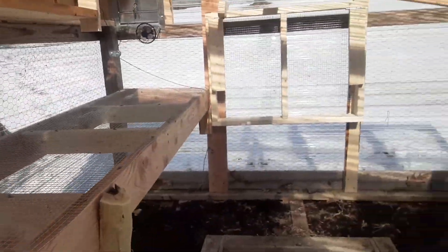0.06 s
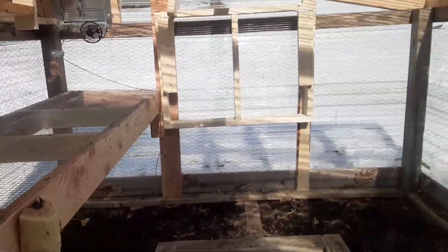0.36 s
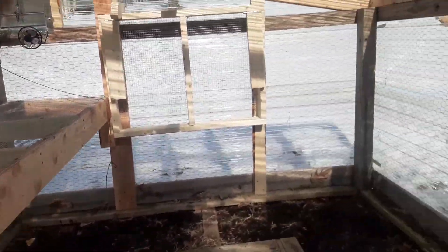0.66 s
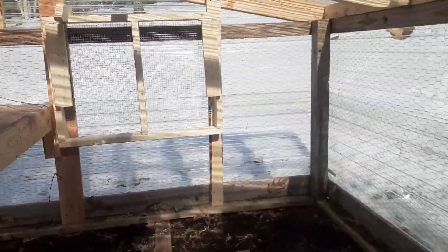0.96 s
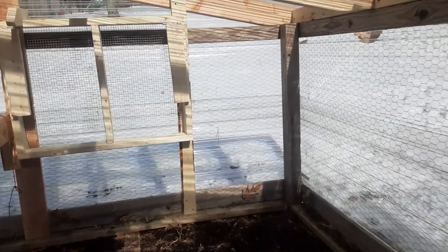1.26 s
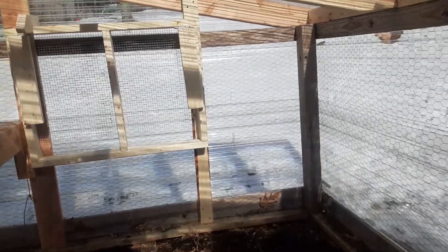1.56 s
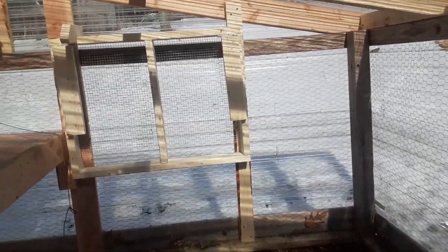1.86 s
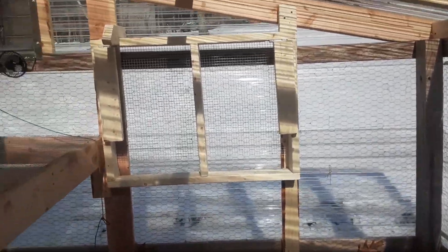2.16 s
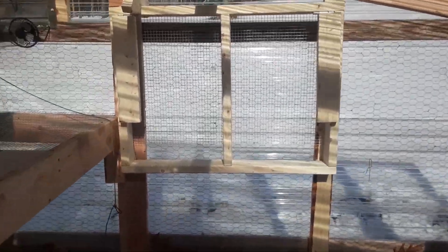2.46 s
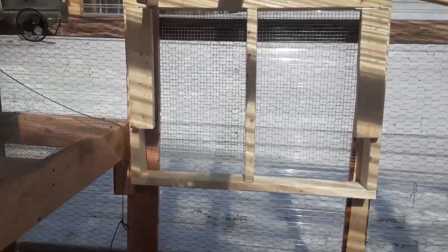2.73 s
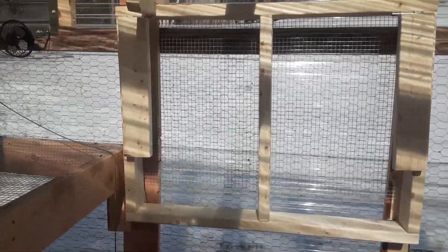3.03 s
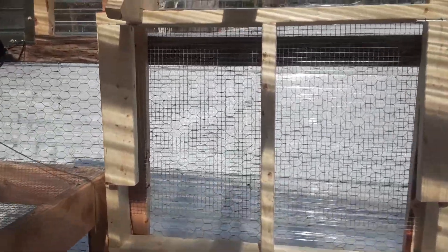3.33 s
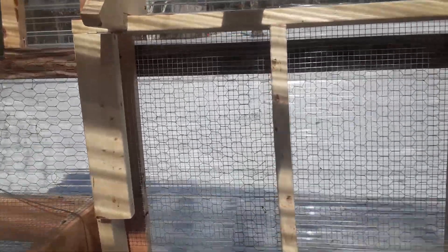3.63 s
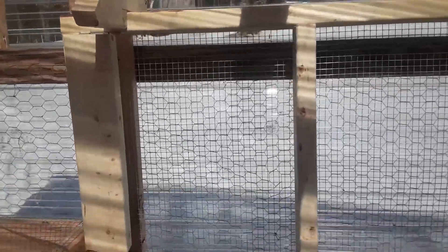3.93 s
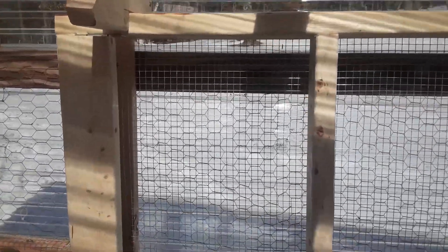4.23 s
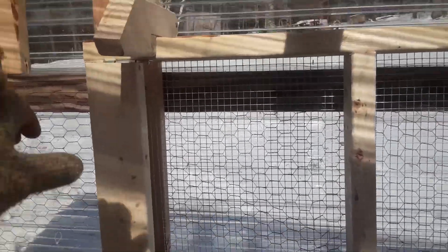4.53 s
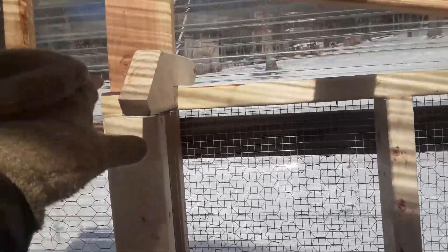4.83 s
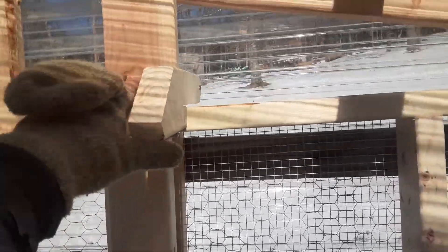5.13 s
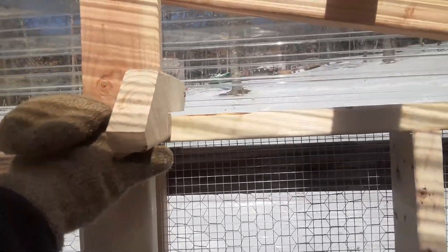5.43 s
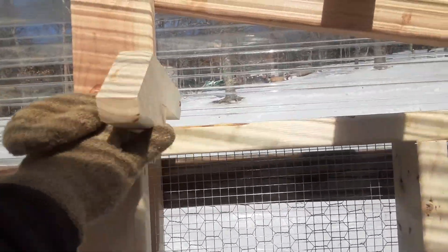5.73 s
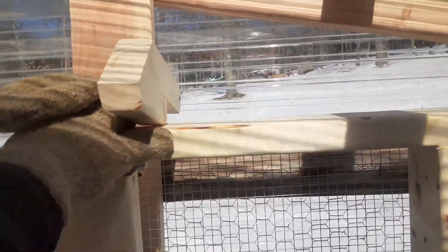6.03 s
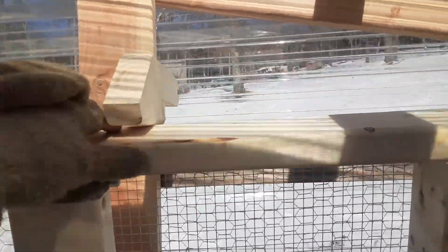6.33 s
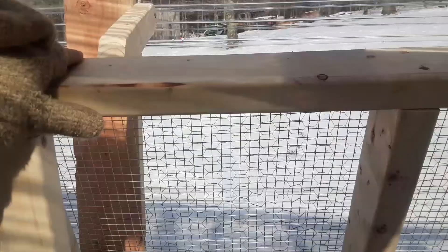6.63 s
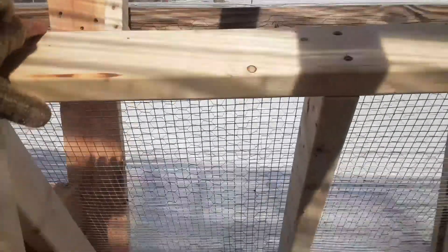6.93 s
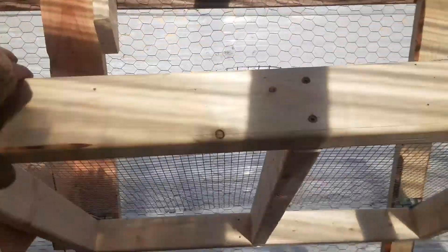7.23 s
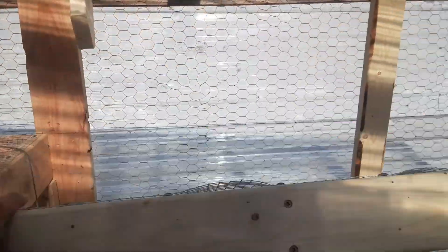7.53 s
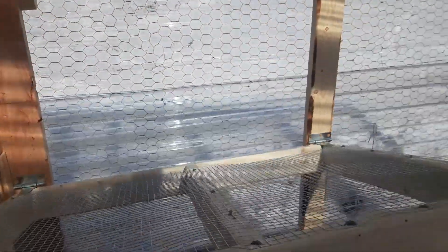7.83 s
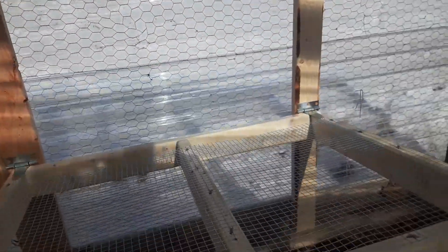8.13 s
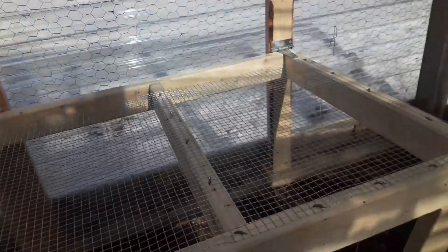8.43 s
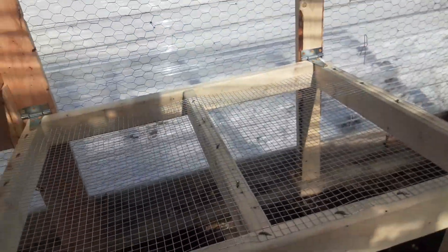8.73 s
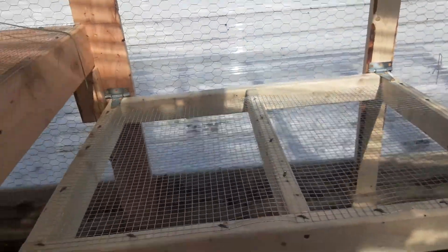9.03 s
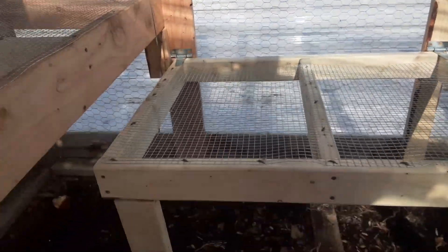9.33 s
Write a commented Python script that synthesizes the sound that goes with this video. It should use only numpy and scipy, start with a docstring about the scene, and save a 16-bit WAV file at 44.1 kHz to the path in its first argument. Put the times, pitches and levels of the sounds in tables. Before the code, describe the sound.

Close up in a small, light-walled greenhouse, quiet steps scuff on soil and something scrapes briefly. Gloved hands work a slightly squeaky wooden catch with rustles and small taps. Heavier knocks follow as a fold-down wooden bench comes loose, each with a rattle of mesh and a shudder of the walls. It drops with a soft swish, bangs onto its legs and ticks as it settles. A faint low hum lies underneath.

```python
"""Gritty steps cross the dirt floor of a small greenhouse, over faint outdoor noise and a low hum.
Something scrapes close by. A gloved hand works the squeaky wooden turn-block of a fold-down bench
until its wooden frame comes free and knocks about. The wire-mesh top swishes down through the air
and the bench lands on its legs, ticking as it settles. Each blow rings the frame, rattles the mesh
and shakes the light walls."""
import sys
import numpy as np
from scipy import signal
from scipy.fft import rfft, irfft, next_fast_len
from scipy.io import wavfile
from scipy.ndimage import uniform_filter1d, map_coordinates

SR = 44100
rng = np.random.default_rng(int(sys.argv[2]) if len(sys.argv) > 2 else 0)


def unload_audio(sound):
    """Save the sound as a 16-bit wav file, at the path given as the first command line argument."""
    columns = np.transpose(np.atleast_2d(sound))
    # keep every value between -1 and 1, then stretch to whole-number steps
    steps = np.round(np.clip(columns, -1, 1) * 32767)
    wavfile.write(sys.argv[1], SR, steps.astype(np.int16))


N = 413216

# blows on the frame: start_s, level_db, edge_db
BLOWS = [(5.384, -40.5, -14.5), (5.575, -28.5, -12.5), (5.632, -26, -30.5), (5.766, -39.5, -17.5),
         (5.953, -26, -11.5), (6.027, -4, -14.5), (6.189, -24, -12.5), (6.245, -25, -20.5),
         (6.324, -32, -15), (6.7695, -3.5, 2), (6.847, -15, -26), (7.038, -14.5, -10.5),
         (7.12, -32.5, -6.5), (8.2609, -2, 1)]
LANDING_S = BLOWS[-1][0]
# wall vibration spectrum: freq_hz, level_db
WALL_SPECTRUM = [(25, -31), (60, -1.5), (120, 4.5), (200, 1), (250, -7.5), (335, 0), (430, -9.5),
                 (530, -16), (800, -18), (1150, -23.5), (1550, -27), (3000, -41), (8000, -51.5),
                 (15000, -61.5)]
# gritty contact spectrum: freq_hz, level_db
GRIT_SPECTRUM = [(100, -8.5), (400, -4), (600, -2.5), (850, -0.5), (1300, 0), (2200, -5), (4000, -11.5),
                 (8000, -14.5), (15000, -25)]


def knocks(shudder_db=-6.5, bass_per_edge=-0.15):
    """Each blow rings the frame; mesh and walls take it up, dying fast, then slowly."""
    # frame modes: freq_hz, level_db, t60_s
    frame_modes = [(84, -44.5, 0.25), (128.6, -22.5, 0.26), (190.6, -13.5, 0.33), (307.4, -2.5, 0.11),
                   (340.2, -4.5, 0.22), (348, -19, 0.059), (438.5, -8, 0.12), (499, -15, 0.18),
                   (560, -18, 0.17), (660, -10, 0.065), (774, 1, 0.026), (836, -23.5, 0.044),
                   (1017, -13.5, 0.031), (1526, -15.5, 0.042), (1808, -30, 0.054)]
    # gentle blows stay in contact longer, so carry more bass: level_db, bass_db
    bass_by_force = [(-36.5, 10.5), (-13, -10), (-1.5, -9)]
    out, t = np.zeros((2, N)), np.arange(3 * SR // 2) / SR
    frame = ring(frame_modes, t) * (1 - np.exp(-t / 0.002))
    wall_decay = (amp(-60 * t / 0.37) + amp(-17 - 60 * t / 1.79)) * (1 - np.exp(-t / 0.0045))
    for start_s, level_db, edge_db in BLOWS:
        shudder = amp(shudder_db) * wall_decay * spread(grains(len(t), spike_db=2), WALL_SPECTRUM)
        crack = amp(-20 - 60 * t / 0.036) * spread(noise(len(t)), GRIT_SPECTRUM, tilt_db=-2.5)
        # loose mesh chatters against its staples
        spurts = amp(-45 - 60 * t / 1.87) * amp(3 * wobble(22)[:len(t)])
        chatter = spurts * spread(grains(len(t), spike_db=3), GRIT_SPECTRUM, tilt_db=-3.5)
        # a padded contact trades upper modes for bass
        bass_db = np.interp(level_db, *np.transpose(bass_by_force)) + bass_per_edge * edge_db
        contact = [(25, -7), (60, bass_db - 0.5), (130, bass_db), (290, 1),
                   (430, -2.5 + 0.27 * edge_db), (600, edge_db)]
        add(out, start_s, amp(level_db) * causal(frame + shudder + crack + chatter, contact))
    return out


def swish(start_s=7.72, rise_s=0.19, level_db=-40, growth_db_per_s=6, hoot_hz=370, hoot_db=2):
    """Wires shed eddies as the bench falls: louder and deeper, with a growing hoot, until it lands."""
    # eddy spectrum: freq_hz, level_db
    eddies = [(100, -22), (220, -12.5), (330, 1), (520, -7.5), (1000, -4.5), (1600, -13), (3000, -25),
              (8000, -39), (15000, -54)]
    t, fall_s = np.arange(N) / SR - start_s, LANDING_S - start_s
    swing = np.clip(t / fall_s, 0, 1)
    bright = np.sqrt(1 - swing) * spread(noise(N), eddies, tilt_db=4)
    deep = np.sqrt(swing) * spread(noise(N), eddies, tilt_db=1.5)
    hoot = amp(hoot_db) * swing ** 2 * unit(resonance(spread(noise(N), eddies), hoot_hz, q=2.6))
    speed = stroke(t, rise_s, fall_s - rise_s, t60_s=0.12)
    gain = speed ** 1.84 * amp(level_db + growth_db_per_s * fall_s * swing + 0.88 * wobble(56))
    return gain * (bright + deep + hoot)


def steps(mid_db=-40, mid_t60_s=0.28, halving_db=20.5):
    """Gritty scuffs swell and die, firm ones soonest; heels thump the soil."""
    # sole scuffs: start_s, level_db, rise_s, tilt_db_per_octave, pitch_hz
    scuffs = [(.15, -64, 0.28, 0.5, 450), (.82, -55.5, 0.0039, 2, 2970), (1.538, -48.5, 0.016, 1.5, 2000),
              (2.332, -47.5, .003, -6, 880), (2.41, -38.5, 0.055, 0, 427), (2.703, -51, 0.0068, 1, 1280),
              (2.812, -42.5, 0.013, 0, 1640), (2.959, -50.5, 0.0016, 7, 1260),
              (3.548, -45, 0.023, -2, 1250), (3.817, -35, 0.0092, 0.5, 810),
              (4.191, -24.5, 0.012, -1.5, 1220), (4.286, -40, 0.0067, -3, 1520),
              (4.73, -24, 0.033, -4.5, 1030), (5.331, -49.5, 0.0067, 3.5, 2820)]
    # heel strikes: start_s, relative_db
    heels = [(2.71, -41), (3.561, -35.5), (3.614, -33), (3.873, -36.5), (4.217, -30.5), (4.744, -30)]
    # soil modes: freq_hz, level_db, t60_s
    soil_modes = [(105.2, 0.5, 0.12), (184, -3, 0.074), (300, -4, 0.066)]
    out, t = np.zeros((2, N)), np.arange(SR) / SR
    for start_s, level_db, rise_s, tilt_db, pitch_hz in scuffs:
        t60_s = mid_t60_s * 2 ** ((mid_db - level_db) / halving_db)
        envelope = amp(level_db) * stroke(t, rise_s, 0, t60_s)
        add(out, start_s, envelope * grit(tilt_db, pitch_hz, note_gain=0.37))
    thump = amp(8.5) * ring(soil_modes, t) * (1 - np.exp(-t / 0.0069))
    for start_s, relative_db in heels:
        add(out, start_s, amp(relative_db) * thump)
    return out


def scrape(start_s=4.727, level_db=-25, slip_hz=315, jitter=0.22):
    """A quick run of uneven slips with friction noise between them."""
    # scrape spectrum: freq_hz, level_db
    spectrum = [(50, -49), (110, -20.5), (200, -16), (310, 1), (410, -13), (510, -2.5), (680, -9),
                (950, -10), (1500, -21), (3000, -38.5), (8000, -42), (12500, -34), (15500, -65.5)]
    gaps_s = np.exp(jitter * rng.standard_normal(64)) / slip_hz
    slips = np.zeros((2, N))
    slips[0, np.round((start_s + np.cumsum(gaps_s)) * SR).astype(int)] = np.sqrt(SR / slip_hz)
    pressure = stroke(np.arange(N) / SR - start_s, rise_s=0.0084, hold_s=0.021, t60_s=0.12)
    friction = spread(4 * slips + noise(N), spectrum)
    return highpass(amp(level_db) * pressure * friction, 70)


def handling(grasp_s=5.07, turn_s=1.35, rub_rise_s=0.02, grip_db=-15.5, squeak_hz=1482, squeak_db=-5):
    """Cloth slides; the push makes the glove creep and the walls rumble; the turning block squeaks."""
    # sleeve and glove strokes: start_s, length_s, level_db
    rubs = [(0.247, .1, -68), (0.967, 0.16, -67), (1.91, 0.49, -60.5), (2.173, 0.018, -54.5),
            (2.821, 0.055, -50.5), (3.565, 0.22, -60.5), (5.073, .09, -57.5), (5.214, 0.095, -61),
            (5.592, .03, -55), (5.827, 0.089, -49.5), (5.963, 0.12, -50.5), (6.128, 0.053, -47.5),
            (6.258, 0.071, -52), (6.363, 0.18, -60.5), (6.538, .16, -48), (7.486, 0.2, -67.5)]
    # hand effort on the frame: time_s, level_db
    effort = [(5.1, -70), (5.5, -47.5), (5.66, -39), (5.85, -42), (6.27, -37), (6.44, -43), (7.1, -35.5),
              (7.4, -57.5), (7.75, -61)]
    # cloth friction spectrum: freq_hz, level_db
    cloth_spectrum = [(200, -13), (800, 0.5), (1550, 2), (2300, -1), (4000, -0.5), (8000, 0), (15000, -9.5)]
    t, push = np.arange(N) / SR, gain_curve(effort)
    turning = stroke(t - grasp_s, rub_rise_s, turn_s, t60_s=0.4)
    sliding = sum(amp(level_db) * stroke(t - start_s, rub_rise_s, max(length_s - rub_rise_s, 0), 0.23)
                  for start_s, length_s, level_db in rubs)
    walking = amp(-72.5) * stroke(t, rise_s=0.63, hold_s=3.5, t60_s=6)
    creep = amp(grip_db) * push * turning
    friction = np.sqrt(sliding ** 2 + walking ** 2 + creep ** 2)
    fibres = patchy(grains(N, spike_db=3.5), patch_db=2.5)
    cloth = friction * amp(1.6 * wobble(14)) * spread(fibres, cloth_spectrum)
    note = unit(resonance(resonance(noise(N), squeak_hz, q=11), squeak_hz, q=11))
    squeak = friction * turning * amp(squeak_db + 4.6 * wobble(25)) * note
    rumble = push * amp(1.73 * wobble(14)) * spread(noise(N), WALL_SPECTRUM, tilt_db=2)
    return cloth + squeak + rumble


def ticks(settle_count=9, settle_per_s=9, settle_hz=1500, settle_db=-47.5, fade_db_per_s=19):
    """Single ticks of wood and wire, then fading random ones as the bench settles."""
    # wood and wire contacts: start_s, level_db, pitch_hz
    contacts = [(.667, -55, 670), (1.868, -39, 1190), (3.173, -49, 1450), (4.395, -41.5, 1250),
                (5.139, -54, 1170), (5.238, -47.5, 1100), (6.017, -32.5, 1100), (6.716, -30, 5070),
                (7.039, -40.5, 2295), (7.145, -48, 1870), (7.486, -58.5, 1370), (8.605, -53, 3020)]
    out = np.zeros((2, N))
    for start_s, level_db, pitch_hz in contacts:
        add(out, start_s, amp(level_db) * tick(pitch_hz))
    for k, (jitter, octaves) in enumerate(rng.uniform(-0.87, 0.5, (settle_count, 2))):
        delay_s = (k + 1 + jitter) / settle_per_s
        gain = amp(settle_db - fade_db_per_s * delay_s)
        add(out, LANDING_S + delay_s, gain * tick(settle_hz * 2 ** octaves))
    return out


def tick(pitch_hz, mid_hz=1260, rise_s=0.0019):
    """An abrupt contact rings one note over a snap of grit; higher notes are brighter and shorter."""
    t, octaves = np.arange(SR) / SR, np.log2(pitch_hz / mid_hz)
    decay_scale = 2 ** (-0.69 * octaves)
    snap = stroke(t, rise_s, 0, t60_s=0.065)
    linger = amp(-6) * stroke(t, rise_s, 0, t60_s=0.33 * decay_scale)
    note = ring([(pitch_hz, 2 - octaves, 0.043 * decay_scale)], t)
    return np.maximum(snap, linger) * grit(-1.5 + 3 * octaves, pitch_hz, note_gain=0.45) + note


def grit(tilt_db, pitch_hz, note_gain):
    """One second of gritty contact noise with a hollow note."""
    rough = spread(patchy(grains(SR, spike_db=1.5), patch_db=2), GRIT_SPECTRUM, tilt_db)
    return rough + note_gain * unit(resonance(rough, pitch_hz, q=5.8))


def reflections(x, echo_db=-15, count=6):
    """Plastic panels throw the treble back within milliseconds and let the bass out."""
    out, treble = x.copy(), amp(echo_db) * highpass(x, 850)
    for delays_s in rng.uniform(0.0018, 0.022, (count, 2)):
        for side, delay_s in enumerate(delays_s):
            add(out[side:side + 1], delay_s, treble[side])
    return out


def background(hum_hz=92, air_db=2):
    """Soft outdoor noise and a wavering low hum swell and fade together."""
    # background swell: time_s, level_db
    swell = [(0, -60), (1.4, -58), (2.5, -55.5), (5.2, -54), (7.6, -65), (9.37, -71.5)]
    # outdoor spectrum: freq_hz, level_db
    spectrum = [(25, -27.5), (55, -3.5), (95, 0.5), (150, -6), (350, -1.5), (600, -13), (850, -14),
                (1100, -18), (3000, -26), (8000, -33.5), (15000, -36)]
    phase = 2 * np.pi * np.cumsum(hum_hz + 3 * wobble(7.7)) / SR
    hum = np.sin(phase) * amp(2.2 * wobble(5.2))
    air = amp(air_db) * spread(patchy(noise(N), patch_db=3), spectrum)
    return gain_curve(swell) * (hum + air)


def amp(db):
    """Decibels to gain."""
    return 10 ** (np.asarray(db) / 20)


def unit(x):
    """x at rms 1."""
    return x / np.sqrt(np.mean(x ** 2) + 1e-20)


def along(points, hz):
    """Interpolate (freq_hz, value) points on a log axis."""
    freqs_hz, values = np.transpose(points)
    return np.interp(np.log(hz + 1), np.log(freqs_hz + 1), values)


def gain_curve(points):
    """Per-sample gain from (time_s, level_db) points."""
    return amp(np.interp(np.arange(N) / SR, *np.transpose(points)))


def stroke(t, rise_s, hold_s, t60_s):
    """Attack, hold and release from t = 0."""
    return np.clip(t / rise_s, 0, 1) * amp(-60 * np.maximum(t - rise_s - hold_s, 0) / t60_s)


def ring(modes, t):
    """Damped modes struck at t = 0."""
    return sum(amp(db - 60 * t / t60_s) * np.sin(2 * np.pi * hz * t) for hz, db, t60_s in modes)


def wobble(knots_per_s):
    """Smooth random curve."""
    knots = rng.standard_normal(int(N * knots_per_s / SR) + 4)
    return map_coordinates(knots, [np.arange(N) * knots_per_s / SR])


def noise(size):
    """Two white noises."""
    return rng.standard_normal((2, size))


def grains(size, spike_db):
    """Noise in millisecond grains of random strength."""
    return noise(size) * amp(spike_db * unit(uniform_filter1d(rng.standard_normal(size), size=44)))


def patchy(pair, patch_db):
    """Ever-changing bands stand out, as when contact points shift."""
    spectra = signal.stft(pair, nperseg=512)[2]
    patches = rng.standard_normal(spectra.shape[1:])
    for axis in (0, 1):
        patches = uniform_filter1d(patches, size=9, axis=axis)
    return signal.istft(spectra * amp(patch_db * unit(patches)), nperseg=512)[1][:, :pair.shape[1]]


def spread(pair, spectrum, tilt_db=0):
    """Two unrelated signals to coloured stereo at rms 1: near-mono bass, wide treble."""
    # left-right likeness: freq_hz, correlation
    likeness = [(100, 0.95), (330, 0.83), (700, 0.48), (1300, -0.16), (2200, 0.099), (6000, -0.1)]

    def response(hz):
        angle = np.arccos(np.clip(along(likeness, hz), -1, 1)) / 2
        gain = amp(along(spectrum, hz) + tilt_db * np.log2(1 + hz / 1000))
        return gain * [np.cos(angle), np.sin(angle)]
    mid, side = filtered(pair, response)
    return unit(np.array([mid + side, mid - side]))


def filtered(x, response):
    """Zero-phase filter of gain response(hz)."""
    size = next_fast_len(x.shape[-1] + 8192)
    return irfft(rfft(x, size) * response(np.fft.rfftfreq(size, 1 / SR)), size)[..., :x.shape[-1]]


def causal(x, spectrum, size=4096):
    """Minimum-phase filter: nothing sounds before the blow."""
    cepstrum = irfft(np.log(amp(along(spectrum, np.fft.rfftfreq(size, 1 / SR)))))
    cepstrum[1:size // 2] *= 2
    cepstrum[size // 2:] = 0
    impulse = irfft(np.exp(rfft(cepstrum)))
    return signal.fftconvolve(x, impulse[None], axes=1)[:, :x.shape[-1]]


def highpass(x, cutoff_hz):
    """Causal second-order high-pass."""
    return signal.sosfilt(signal.butter(2, cutoff_hz, "high", fs=SR, output="sos"), x)


def resonance(x, centre_hz, q):
    """Resonant band-pass."""
    return signal.lfilter(*signal.iirpeak(centre_hz, q, fs=SR), x)


def add(track, start_s, sound):
    """Mix sound into track at start_s."""
    part = track[:, round(start_s * SR):][:, :sound.shape[-1]]
    part += sound[..., :part.shape[1]]


def scene():
    """Sources between the walls plus background; each band leans slightly to one side."""
    # stereo balance: freq_hz, left_minus_right_db
    balance = [(100, 2.5), (330, 2.5), (600, 0.5), (1000, -1.5), (2200, 0), (4000, 2.5), (8000, -1),
               (14000, 2.5)]
    indoors = knocks() + steps() + ticks() + scrape() + handling() + swish()
    mix = reflections(indoors) + background()
    return filtered(mix, lambda hz: amp(np.outer([0.5, -0.5], along(balance, hz))))


def record(dry, top_hz=15850):
    """Microphone with a treble notch, clipping at full scale, band limit."""
    # microphone response: freq_hz, gain_db
    microphone = [(22, -7.5), (50, -0.5), (5000, -0.5), (8400, 2.5), (9400, -6), (10300, -5.5),
                  (11500, -0.5), (14500, 3), (15800, -1)]
    coloured = filtered(dry, lambda hz: amp(along(microphone, hz)))
    return filtered(np.clip(coloured, -1, 1), lambda hz: hz < top_hz)


dry = scene()
out = record(dry)
unload_audio(out)
```